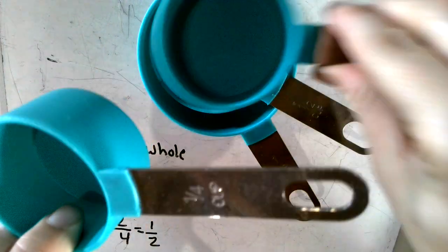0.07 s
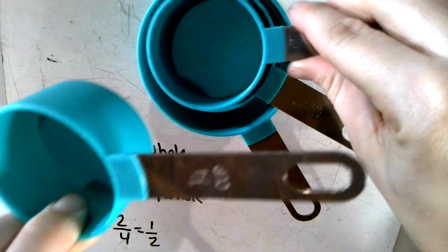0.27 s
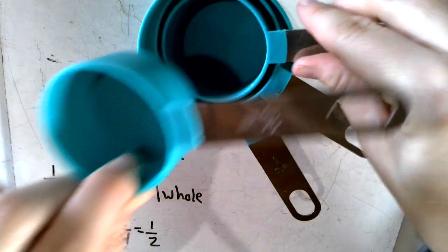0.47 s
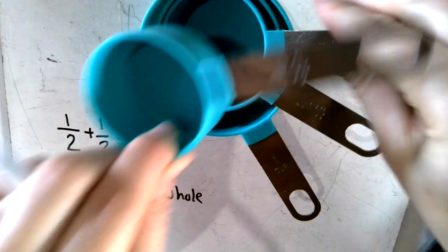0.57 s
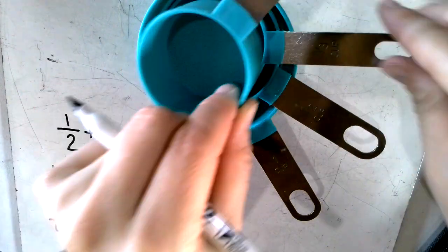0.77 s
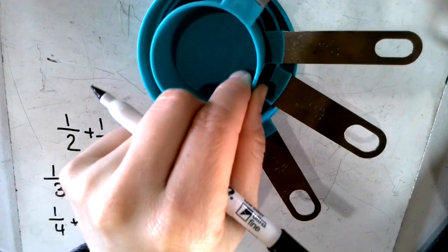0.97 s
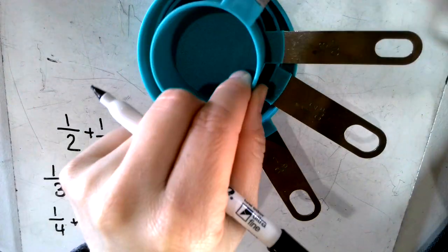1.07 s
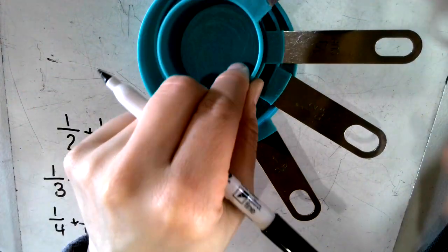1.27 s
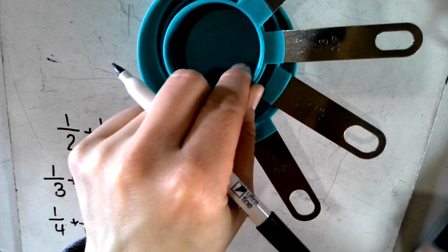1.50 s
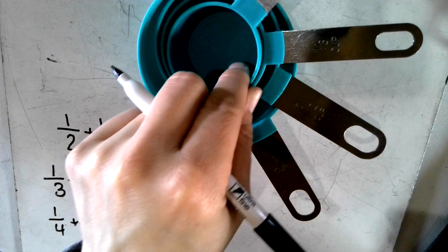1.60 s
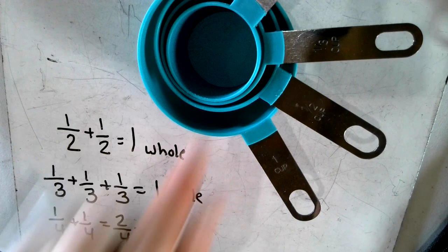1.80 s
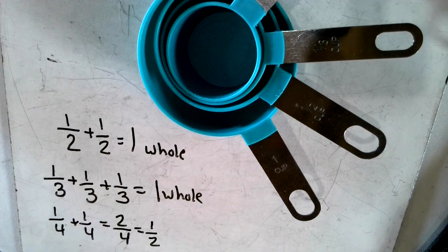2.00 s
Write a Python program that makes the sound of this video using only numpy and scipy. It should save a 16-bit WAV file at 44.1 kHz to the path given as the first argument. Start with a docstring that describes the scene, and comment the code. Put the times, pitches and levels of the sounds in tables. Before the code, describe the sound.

Hollow plastic cup knocks with light metallic handle clinks and dull board thumps come in a quick cluster, ease off, then return with a short scrape and final clacks, heard closely in a small, slightly reverberant room.

```python
"""In a small room, plastic measuring cups with steel handles are nested and nudged on a hard board.
Knocks are impulses that ring the damped modes of rims, cup walls, board and handles.
Sliding drives the same bodies and the table below with random friction grains; one scrape glides.
Soft bumps, treble cracks and a diffuse room tail join them.
A close microphone hisses faintly, and its noise gate lowers the hiss in the pauses."""
import sys
import numpy as np
from scipy import signal
from scipy.fft import rfft, irfft
from scipy.io import wavfile
from scipy.ndimage import uniform_filter1d

SR = 44100
rng = np.random.default_rng(int(sys.argv[2]) if len(sys.argv) > 2 else 0)


def materialize(psi):
    """Save the field psi as 16-bit PCM at rate SR to the path in sys.argv[1].

    A 1-D psi becomes a single channel; in a 2-D psi each row is a channel.
    """
    bounded = np.clip(np.atleast_2d(psi).T, -1, 1)
    quanta = np.round(bounded * 32767).astype(np.int16)
    wavfile.write(sys.argv[1], SR, quanta)


def gain_from_db(level_db):
    """Turn a decibel level (scalar or array-like) into a linear amplitude factor."""
    decades = np.asarray(level_db, float) / 20
    return 10 ** decades


N = 90404
TIME_S = np.arange(N) / SR
TREBLE_EDGE_HZ = 15700


def rms_one(x):
    """Normalization: a signal divided by its root mean square has unit power."""
    return x / np.sqrt(np.mean(x ** 2) + 1e-20)


def sample(s):
    """Sampling: a time in seconds becomes the index of a sample."""
    return np.minimum((np.asarray(s) * SR).astype(int), N - 1)


def level_curve(t, db):
    """Envelope: levels in dB are interpolated over time, and stay at -120 dB outside the curve."""
    return gain_from_db(np.interp(TIME_S, t, db, left=-120, right=-120))


# Spectrum of rumble and hiss; columns: f/Hz, relative spectral density level/dB
BACKGROUND_SPECTRUM = [(40, -27), (130, 4), (450, -10), (1000, -19), (3000, -22.5), (7500, -27.5),
                       (9500, -21), (15700, -21)]
BACKGROUND_DB = -69.5  # rms, before the gate's lift


def background():
    """Stationary noise: white noise is shaped in frequency into room rumble and microphone hiss."""
    hz, db = np.transpose(BACKGROUND_SPECTRUM)
    f = np.arange(N // 2 + 1) * SR / N + 1  # the offset keeps the logarithm finite
    shape = gain_from_db(np.interp(np.log(f), np.log(hz), db)) * (f < TREBLE_EDGE_HZ)
    noise = irfft(rfft(rng.standard_normal(N)) * shape, N)
    return gain_from_db(BACKGROUND_DB) * rms_one(noise)


ROOM_T60_S, ROOM_DB, ROOM_CUT_HZ = 0.31, -22.5, 11000


def room(x):
    """Diffuse reverberation: the sound is convolved with decaying, dulled noise."""
    t = np.arange(SR) / SR
    onset = np.minimum(t / 0.024, 1)
    tail = rng.standard_normal(SR) * gain_from_db(-60 * t / ROOM_T60_S) * onset
    dull = signal.butter(1, ROOM_CUT_HZ, fs=SR, output="sos")
    tail = signal.sosfilt(dull, tail)
    tail = tail / np.sqrt(np.sum(tail ** 2))
    return gain_from_db(ROOM_DB) * signal.fftconvolve(x, tail)[:N]


def ring(clicks, hz, t60):
    """Damped resonance: a unit click sets a decaying sine of initial height 1 ringing."""
    r = gain_from_db(-60 / (max(t60, .004) * SR))
    w = 2 * np.pi * hz / SR
    return signal.lfilter([0, np.sin(w)], [1, -2 * r * np.cos(w), r * r], clicks + 1e-18)


def soften(x, seconds):
    """Finite contact time: a double one-pole low-pass spreads the force of a soft contact."""
    r = np.exp(-1 / (abs(seconds) * SR + 1e-3))
    return signal.lfilter([(1 - r) ** 2], [1, -2 * r, r * r], x)


def skirt(x, modes):
    """Radiation efficiency: a small body radiates little outside the span of its modes."""
    hz = np.array(modes)[:, 0]
    span = [.7 * hz.min(), 1.2 * hz.max()]
    return signal.sosfilt(signal.butter(3, span, "band", fs=SR, output="sos"), x)


GRAINS_PER_S, GRAIN_SPREAD_DB = 1200, 3


def grains():
    """Stick-slip friction: random clicks of uneven size and sign."""
    spread = np.minimum(rng.exponential(1, N), 4)
    sizes = gain_from_db(GRAIN_SPREAD_DB * spread) * rng.choice([-1, 1], N)
    return sizes * (rng.random(N) < GRAINS_PER_S / SR)


# Modes of each body; columns: f/Hz, relative level/dB, t60/s
TABLE_MODES = [(51.2, -4.5, 0.18), (73.2, 1.5, 0.085), (152.7, 10, 0.068), (209, 6, 0.065)]
BOARD_MODES = [(254.6, -14, 0.17), (308.3, -9.5, 0.11), (409.7, -4, 0.07), (470.4, -2.5, 0.096),
               (677, -6.5, 0.062)]
WALL_MODES = [(837.4, -3, 0.042), (900, -5.5, .05), (1066, -4, 0.037), (1400, -31, 0.23)]  # cup walls
RIM_MODES = [(1482, 0, 0.067), (1626.3, -2, 0.053), (1669.4, -2, 0.03), (1759, -10, 0.029),
             (2050, -31.5, .12)]  # cup rims
HANDLE_MODES = [(2460, -5.5, .04), (2654, 3, 0.033), (2970, 1.5, 0.032), (3300, -1.5, 0.025),
                (4097, -3, 0.03), (4386, 2, 0.018), (5150, -4.5, 0.049), (5710, -2.5, 0.02),
                (6700, -12, 0.02)]
STEEL_MODES = [(2500, -7.5, 0.25), (3920, -7, .2), (5330, -18.5, .25)]  # long, thin rings of the free steel handles
# Sliding and pressing in each body; columns: t/s, level/dB
TABLE_RUBBING = [(.06, -66), (0.098, -41), (.27, -68), (0.351, -37.5), (0.568, -42), (.7, -67.5),
                 (.91, -94), (.95, -53.5), (1.288, -66.5), (1.326, -41.5), (1.429, -54), (1.58, -50.5),
                 (1.7, -72)]
BOARD_RUBBING = [(.07, -83), (0.098, -40), (.28, -47), (.47, -26), (.6, -37.5), (.8, -69.5), (.91, -87),
                 (.96, -57.5), (1.1, -43), (1.278, -52.5), (1.34, -29), (1.429, -55), (1.59, -36),
                 (1.678, -88.5)]
WALL_RUBBING = [(0.056, -66), (0.061, -43), (0.189, -46), (.26, -60), (0.451, -34.5), (0.721, -62),
                (0.8, -110), (.95, -55), (1.199, -63.5), (1.44, -53.5), (1.531, -64), (1.601, -50.5),
                (1.68, -101)]
HANDLE_RUBBING = [(0.055, -69), (0.078, -53.5), (.24, -85), (0.349, -65), (.38, -56.5), (0.549, -68.5),
                  (0.619, -104), (1.28, -74.5), (1.329, -56.5), (1.42, -89.5), (1.53, -79), (1.56, -62),
                  (1.75, -98)]
RIM_SHARE_DB = -3  # rims against walls


def rub(modes, curve):
    """Friction-driven resonance: dense grains keep the modes of one body sounding."""
    friction = grains()
    body = np.zeros(N)
    for k, (hz, db, t60) in enumerate(modes):
        sign = (-1) ** k  # neighbouring modes have opposite polarity
        body += sign * gain_from_db(db) * ring(friction, hz, t60)
    return level_curve(*np.transpose(curve)) * rms_one(skirt(body, modes))


def sliding():
    """Superposition: friction sounds the table, board, walls, rims and handles together."""
    rubbed = rub(TABLE_MODES, TABLE_RUBBING) + rub(BOARD_MODES, BOARD_RUBBING)
    rubbed += rub(WALL_MODES, WALL_RUBBING)
    rubbed += gain_from_db(RIM_SHARE_DB) * rub(RIM_MODES, WALL_RUBBING)
    return rubbed + rub(HANDLE_MODES + STEEL_MODES, HANDLE_RUBBING)


# The last cup scrapes down into the stack, ringing the gap; columns: t/s, f/Hz, level/dB
NESTING_GLIDE = [(1.21, 900, -62), (1.24, 934, -39.5), (1.29, 840, -36.5), (1.309, 780, -24.5),
                 (1.317, 830, -65)]
NESTING_WIDTH_HZ = 190


def nesting():
    """Moving resonance: friction grains are filtered in a band that follows a gliding pitch."""
    s, hz, db = np.transpose(NESTING_GLIDE)
    smooth = signal.butter(2, NESTING_WIDTH_HZ / 2, fs=SR, output="sos")
    carrier = np.exp(2j * np.pi * np.cumsum(np.interp(TIME_S, s, hz)) / SR)
    lowered = signal.sosfilt(smooth, grains() * np.conj(carrier))
    band = np.real(lowered * carrier)
    return level_curve(s, db) * rms_one(band)


# Soft bumps of the stack on the board; columns: t/s, level/dB
SOFT_BUMPS = [(0.178, -25.5), (.342, -26), (0.455, -45), (0.601, -27), (1.051, -31), (1.075, -25.5),
              (1.459, -24.5), (1.559, -29)]
BUMP_CONTACT_S = .002


def bumps():
    """Slow excitation: dull contacts swell two of the board's modes, the third and fourth."""
    s, db = np.transpose(SOFT_BUMPS)
    clicks = np.zeros(N)
    clicks[sample(s)] = gain_from_db(db)
    swell = soften(clicks, BUMP_CONTACT_S)
    out = np.zeros(N)
    for hz, mode_db, t60 in BOARD_MODES[2:4]:
        push = 2 * swell * np.cos(2 * np.pi * (hz * TIME_S + rng.random()))
        out += gain_from_db(mode_db) * ring(push, hz, t60)
    return out


# Bright cracks of the hardest knocks; columns: t/s, level/dB
BRIGHT_CRACKS = [(0.072, -50.5), (0.373, -46.5), (1.313, -53), (1.5421, -42.5)]
CRACK_DECAY_S, CRACK_LOW_HZ = .004, 6500  # the decay is a time constant


def cracks():
    """Transient noise: exponentially decaying bursts of band-passed treble noise."""
    s, db = np.transpose(BRIGHT_CRACKS)
    clicks = np.zeros(N)
    clicks[sample(s)] = gain_from_db(db)
    burst = signal.lfilter([1], [1, -np.exp(-1 / (CRACK_DECAY_S * SR))], clicks + 1e-18)
    band = signal.butter(2, [CRACK_LOW_HZ, TREBLE_EDGE_HZ], "band", fs=SR, output="sos")
    return burst * signal.sosfilt(band, rng.standard_normal(N))


MODE_SCATTER_DB = 2.5  # standard deviation


def strike(modes, at, strength_db, contact_s, focus_hz=1, focus_db=0):
    """Modal excitation: each blow drives every mode by its own amount, swelling during contact."""
    out = np.zeros(N)
    chance = rng.standard_normal((len(at), len(modes)))
    for k, (hz, db, t60) in enumerate(modes):
        # modes away from the pitch that the struck spot favours are weaker
        off_focus_db = focus_db * np.abs(np.log2(hz / focus_hz))
        clicks = np.zeros(N)
        clicks[at] = gain_from_db(strength_db + db - off_focus_db + MODE_SCATTER_DB * chance[:, k])
        # soften around the mode's own pitch, so that the contact only slows its swell
        wave = np.exp(2j * np.pi * hz * TIME_S)
        force = 2 * np.real(soften(clicks * np.conj(wave), contact_s) * wave)
        out += ring(force, hz, t60)
    return skirt(out, modes)


# Knocks; columns: t/s, rim level/dB, board level/dB, wall level/dB, handle level/dB,
# favoured rim f/Hz, favoured handle f/Hz
CUP_KNOCKS = [(0.0708, -5, -30, -16, -33, 1744, 3917), (0.2863, -37.5, -26, -17, -78, 1650, 3430),
              (0.3289, -38.5, -22, -24, -50, 1700, 4200), (0.371, -5.5, -19.5, -8.5, -27, 1430, 3280),
              (0.4381, -8.5, -11, -32, -27, 1530, 4200), (0.4419, -47.5, -59, -14, -37, 1500, 4350),
              (0.4836, -21, -38, -31, -42.5, 1550, 4070), (0.4984, -24, -22, -29, -34, 1640, 3620),
              (0.532, -25, -22, -27.5, -50, 1460, 4100), (0.9281, -23.5, -60, -30.5, -48.5, 1610, 2450),
              (0.9367, -30, -34, -39, -58, 1480, 2420), (1.3113, -15, -17, -16, -31, 1510, 4550),
              (1.3189, -20, -37.5, -35, -35, 1700, 3000), (1.3263, -37, -24, -21, -41.5, 1600, 4500),
              (1.439, -38.5, -31, -35, -72.5, 1500, 2330), (1.445, -35.5, -32, -31, -67, 1455, 2330),
              (1.4761, -44, -28, -27.5, -75, 1600, 2980), (1.5426, -13, -35, -46, -28.5, 1586, 3050),
              (1.5517, -14, -28.5, -26, -53, 1460, 2300), (1.5754, -25.5, -29, -29, -46.5, 1520, 4200)]
# Contact time constant as felt by each body; entries: rim t/s, board t/s, wall t/s, handle t/s
CONTACT_TIMES = [0.00055, 0.0011, 0.001002, 0.00014]
RIM_FOCUS_DB, HANDLE_FOCUS_DB = 45, 27.5  # dB per octave from the favoured pitch


def knocks():
    """Impact sound: cups hit cups and board, and rims, board, walls and handles ring freely."""
    s, rim_db, board_db, wall_db, handle_db, rim_hz, handle_hz = np.transpose(CUP_KNOCKS)
    rim_s, board_s, wall_s, handle_s = CONTACT_TIMES
    at = sample(s)
    rims = strike(RIM_MODES, at, rim_db, rim_s, rim_hz, RIM_FOCUS_DB)
    board = strike(BOARD_MODES, at, board_db, board_s)
    walls = strike(WALL_MODES, at, wall_db, wall_s)
    handles = strike(HANDLE_MODES, at, handle_db, handle_s, handle_hz, HANDLE_FOCUS_DB)
    return rims + board + walls + handles


def scene():
    """Superposition: the direct sound of the cups adds to its reverberation."""
    cups = sliding() + nesting() + bumps() + cracks() + knocks()
    return (cups + room(cups))[None]


def low_pass(x):
    """Removes everything above the highest recorded frequency."""
    return signal.sosfilt(signal.butter(12, 16470, fs=SR, output="sos"), x)


GATE_OPEN_DB, GATE_WIDTH_DB, GATE_LIFT_DB = -45, 19, 8
GATE_RELEASE_DB_PER_S = 116
MIC_LOW_HZ = 46


def record(dry):
    """Level-dependent gain: the gate lifts the background with the cups and lets it sink after."""
    level = 10 * np.log10(uniform_filter1d(dry[0] ** 2, size=441) + 1e-12)  # 10 ms power
    # the held level follows rises and falls at the release rate
    ramp = GATE_RELEASE_DB_PER_S * TIME_S
    held = np.maximum.accumulate(level + ramp) - ramp
    closing = np.exp(np.clip((GATE_OPEN_DB - held) / GATE_WIDTH_DB, -30, 30))
    gate_db = GATE_LIFT_DB / (1.0 + closing)
    low_cut = signal.butter(4, MIC_LOW_HZ, "high", fs=SR, output="sos")
    mix = signal.sosfilt(low_cut, dry + background() * gain_from_db(gate_db))
    return low_pass(mix)


dry = scene()
out = record(dry)
materialize(out)
```